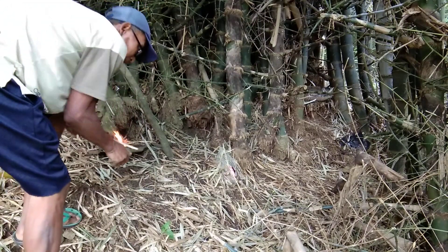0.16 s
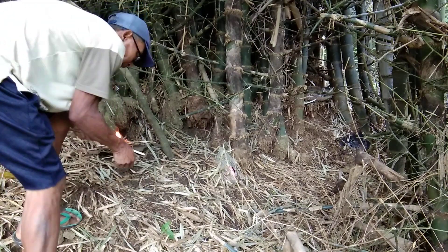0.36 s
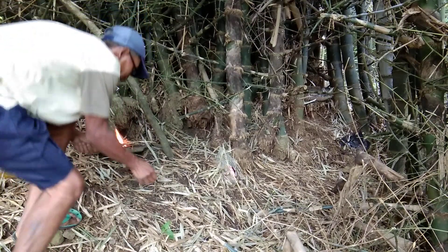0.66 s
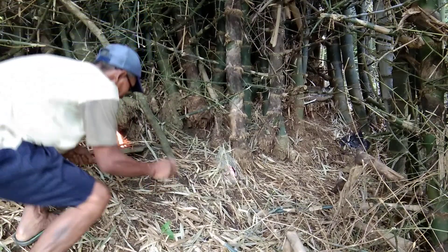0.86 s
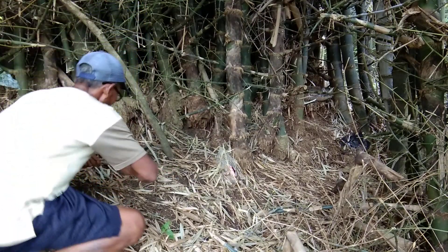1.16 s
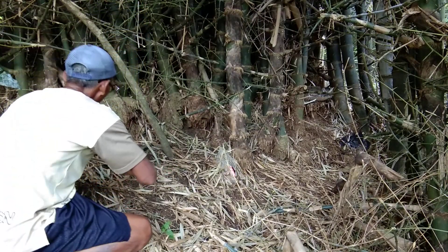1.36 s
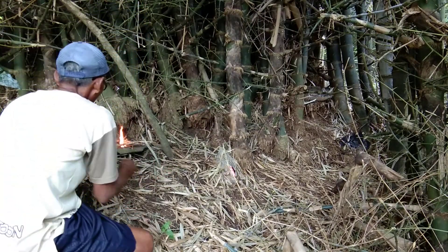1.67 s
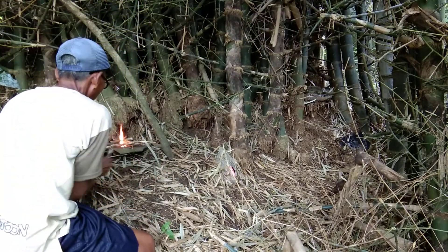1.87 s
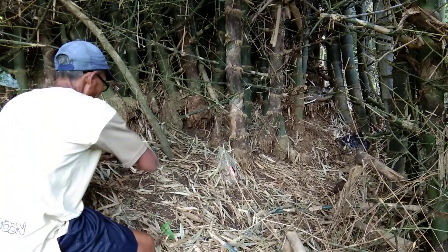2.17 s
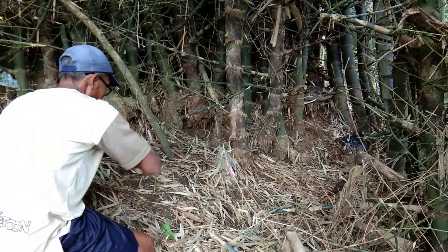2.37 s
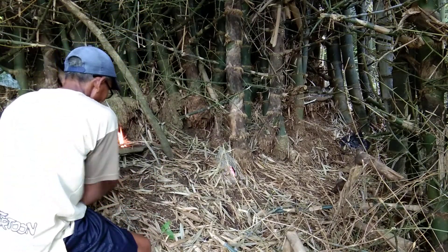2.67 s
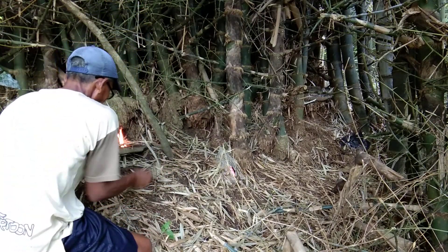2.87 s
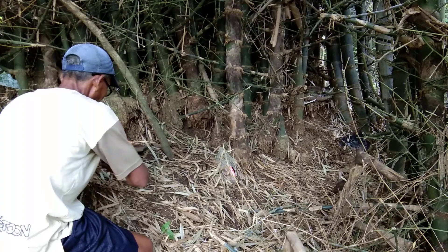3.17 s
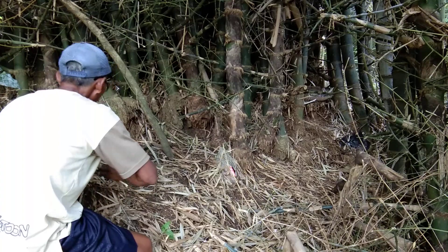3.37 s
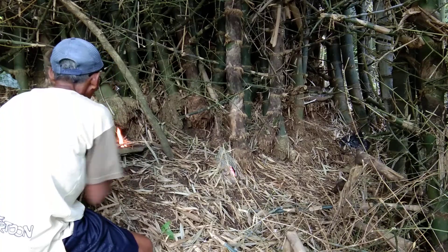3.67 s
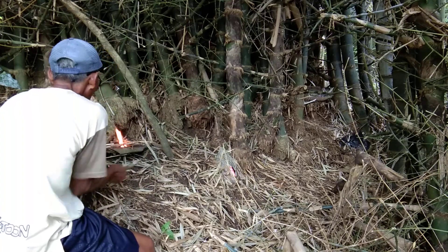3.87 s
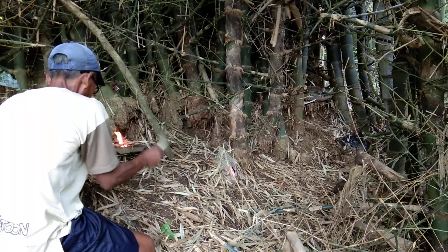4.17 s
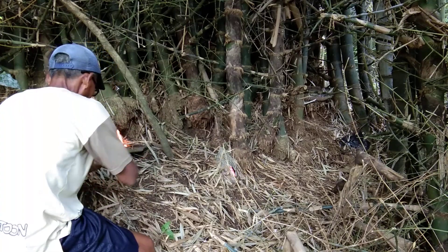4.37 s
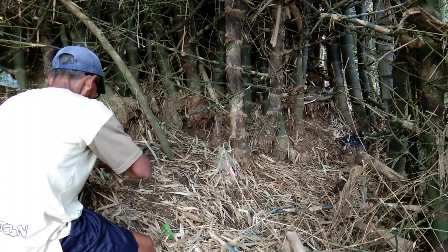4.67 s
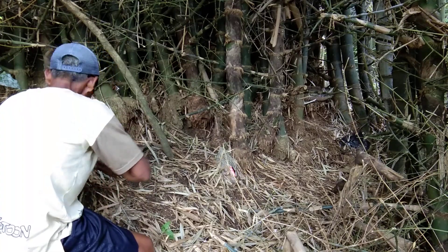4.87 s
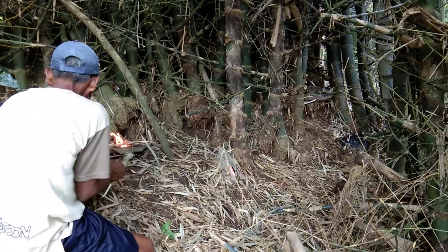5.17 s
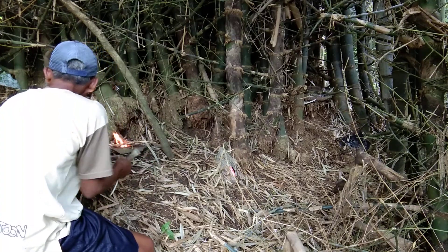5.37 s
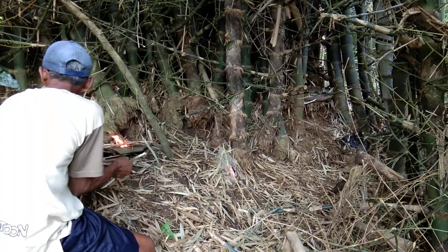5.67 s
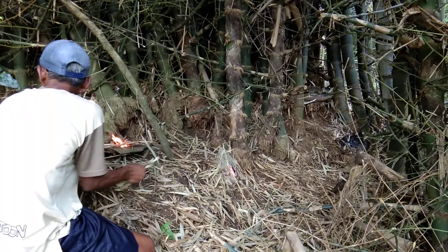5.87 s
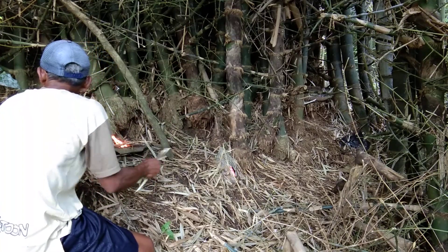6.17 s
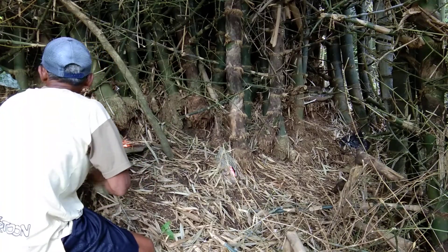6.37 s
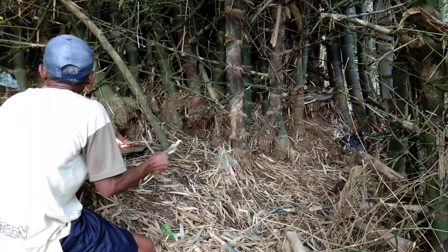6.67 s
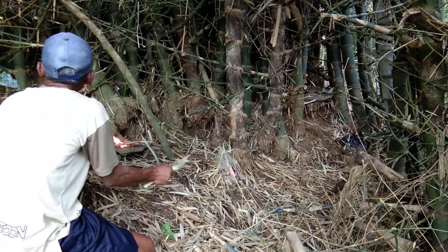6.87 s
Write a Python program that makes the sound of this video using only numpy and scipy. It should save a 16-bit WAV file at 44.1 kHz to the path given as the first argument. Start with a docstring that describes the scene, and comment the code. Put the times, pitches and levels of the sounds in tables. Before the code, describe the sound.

Close by in a bamboo thicket, a heavy twig cracks almost at once with a small thud, then more sharp snaps of uneven strength follow. Sticks knock lightly, and dry leaves rustle, fizz and crunch in short bursts, busiest around two seconds. Each strong snap scatters briefly off the culms. A small bird gives tiny falling chirps at regular intervals over a quiet outdoor rumble, heard from one fixed spot.

```python
"""Bamboo thicket, with a small fire of dry twigs and leaves that someone crouches by and feeds.
Twigs snap: a click and torn-fibre noise are filtered, and dense random echoes come back from the culms.
Sticks knock as resonant clicks; stirred leaf litter rustles, fizzes and crunches as random tiny clicks.
Two small birds chirp further off in gliding sines, over a low outdoor rumble of filtered noise."""
import sys
import numpy as np
from scipy import signal
from scipy.fft import rfft, irfft
from scipy.io import wavfile

SR = 44100
rng = np.random.default_rng(int(sys.argv[2]) if len(sys.argv) > 2 else 0)


def pcm_store(signal):
    """Save signal as 16-bit PCM."""
    levels = np.round(np.clip(np.atleast_2d(signal), -1, 1) * 32767)
    wavfile.write(sys.argv[1], SR, levels.astype(np.int16).T)


N = 310023


def gain_of(db):
    """Decibels to amplitude gain."""
    return 10 ** (np.asarray(db) / 20)


def evened(x):
    """Scales to an rms of one."""
    return x / np.sqrt(np.mean(x ** 2) + 1e-20)


def read(points, hz):
    """Interpolates (Hz, value) points on a log-frequency axis."""
    f, value = np.transpose(points)
    return np.interp(np.log(hz + 1), np.log(f), value)


def bump(hz, centre_hz, width_hz, lift_db):
    """Lift in dB from one resonance; width_hz is the half width at half the lift."""
    return lift_db / (1 + ((hz - centre_hz) / width_hz) ** 2)


def add(mix, s, sound):
    """Mixes a sound in at s seconds."""
    part = mix[max(round(s * SR), 0):][:len(sound)]
    part += sound[:len(part)]


def coloured(x, colour_db, size=2048):
    """Minimum-phase filter whose gain in dB is a function of frequency."""
    hz = abs(np.fft.fftfreq(size, 1 / SR))
    log_gain = np.log(gain_of(colour_db(hz)))
    taps = np.fft.ifft(np.exp(np.conj(signal.hilbert(log_gain)))).real
    return signal.fftconvolve(x, taps[:size // 2])[:len(x)]


def dying(x, ring, size=128):
    """Decays each band by 60 dB over its own ring time."""
    hz, t, z = signal.stft(x, SR, nperseg=size)
    decay = gain_of(-60 * t / read(ring, hz)[:, None])
    return signal.istft(z * decay, SR, nperseg=size)[1][:len(x)]


def wander(top_hz, count=30):
    """Random sway with an rms of one: sines from a tenth of top_hz up to it."""
    t = np.arange(0, N + 256, 256) / SR
    hz = top_hz * np.geomspace(.1, 1, count)[:, None]
    waves = np.sin(2 * np.pi * (hz * t + rng.random((count, 1)))).sum(0)
    return np.interp(np.arange(N) / SR, t, evened(waves))


def thicket(far_db=-20, spread_db=5.0, echoes_per_s=7000, rise_s=0.0012):
    """Echoes of one click: discrete ones off the nearest culms, plus a noise wash from the whole stand."""
    # Ring of the nearest culms. Each row: frequency in Hz, t60 in s.
    near_ring = [(200, 0.049), (2000, 0.12), (7500, 0.12), (15000, 0.14)]
    # Ring of the whole thicket. Each row: frequency in Hz, t60 in s.
    far_ring = [(200, 0.22), (2500, 0.53), (7500, 0.48), (15000, 0.39)]
    t = np.arange(SR * 2 // 3) / SR
    signs, sizes, far = rng.standard_normal((3, len(t)))
    struck = rng.random(len(t)) < echoes_per_s / SR
    near = np.sign(signs) * gain_of(spread_db * np.clip(sizes, -2, 2)) * struck
    echoes = dying(evened(near), near_ring) + gain_of(far_db) * dying(far, far_ring)
    return echoes * (1 - np.exp(-t / rise_s))


def snap(crack_db, scatter_db, body_db, clack_db, treble_db, twig_hz, edge_db,
         tear_s=0.0015, fibres=0.41, twig_db=7, twig_width_hz=700):
    """A twig breaks: one click, a brief tearing of fibres, the twig's resonance, and the thicket's answer."""
    # Colour of the direct crack. Each row: frequency in Hz, relative level in dB per Hz.
    crack_colour = [(30, -34), (60, -17), (300, -8), (700, -15.5), (1500, -10.5), (2400, -6), (3500, -1.5),
                    (6200, 1.5), (8500, -7), (11000, -6.5), (15500, -5.5)]
    # Colour the culms throw back. Each row: frequency in Hz, relative level in dB per Hz.
    scatter_colour = [(60, -17), (400, -24), (1000, -31), (1900, -15.5), (2700, -12.5), (4500, -3),
                      (6300, -2), (7900, 4.5), (10000, -2.5), (12500, -8.5), (15500, -7)]
    # Hollow culms that ring in every echo. Each row: centre in Hz, half width in Hz, lift in dB.
    culm_modes = [(2440, 67, 4.5), (3290, 100, 6.5), (4130, 250, 1.5), (5800, 170, 3), (6650, 110, 4),
                  (8150, 250, 0)]
    echoes = thicket(spread_db=2.0)
    t = np.arange(len(echoes)) / SR
    tear = fibres * rng.standard_normal(len(t)) * np.exp(-t / tear_s)
    tear[0] = 1  # the click

    def tone_db(hz, top_db):
        tone = [(1900, body_db), (2700, clack_db), (4500, clack_db), (5600, 0), (9000, 0), (12500, top_db)]
        return read(tone, hz)

    def ring_db(hz):
        return bump(hz, twig_hz, twig_width_hz, twig_db)

    def crack_tone_db(hz):
        return read(crack_colour, hz) + tone_db(hz, treble_db + edge_db) + ring_db(hz)

    def scatter_tone_db(hz):
        culms_db = sum(bump(hz, *mode) for mode in culm_modes)
        return read(scatter_colour, hz) + tone_db(hz, treble_db) + 0.57 * ring_db(hz) + culms_db

    crack = coloured(tear, crack_tone_db)
    echoes = coloured(echoes, scatter_tone_db)
    # levels are set over these windows
    first, later = t < .0025, (t > .003) & (t < .023)
    direct = gain_of(crack_db) * crack / crack[first].std()
    return direct + gain_of(scatter_db) * echoes / echoes[later].std()


def snaps(clack_per_body=0.72, plain_clack_db=-0.5, edge_db=-0.2):
    """All the snapping twigs; the hollow clack grows with the woody body, in dB per dB."""
    # Each row: start in s, direct crack in dB, scattered sound in dB, woody body in dB,
    # splintery treble in dB, ring of the twig in Hz.
    twig_breaks = [(0.0981, -11, -19.5, 4.5, -1.5, 6700), (0.178, -37, -46, -2, 4, 6400),
                   (0.4102, -37.5, -48, 0, 2.5, 2920), (0.461, -51, -51, 13, -1, 7800),
                   (1.5179, -25, -36.5, -6.5, 0, 5000), (1.5287, -23, -25.5, -3.5, -1, 8150),
                   (1.8406, -37, -44.5, -7, 4, 8150), (2.2497, -44, -56, 0, 8, 8300),
                   (2.5624, -19, -22.5, 0.5, -5, 6150), (2.7627, -49, -53.5, 10, 4, 6900),
                   (3.6421, -21, -22.5, 0.5, 2.5, 7650), (3.8662, -37, -45, 0, 8, 8600),
                   (3.8764, -27.5, -34.5, 1.5, 7, 8700), (4.0449, -51, -58, 8, -1, 5330),
                   (4.5907, -51, -60, -10, 8, 9100), (4.8437, -50, -53, -1, 4, 5300),
                   (4.9974, -35, -47, -2, 6, 8150), (5.078, -21, -31.5, -7, -1.5, 8200),
                   (5.1764, -48, -50.5, -3, 2, 8340), (5.6389, -44, -53, 6, -3, 6260),
                   (6.32, -50, -55, 6, 0, 2780), (6.399, -52, -55.5, 0, 4, 8400)]
    out = np.zeros(N)
    for s, crack_db, scatter_db, body_db, treble_db, twig_hz in twig_breaks:
        clack_db = plain_clack_db + clack_per_body * body_db
        add(out, s, snap(crack_db, scatter_db, body_db, clack_db, treble_db, twig_hz, edge_db))
    return out


def thump(s=.0978, rise_s=0.00029):
    """The first, heaviest break jolts the ground and rings the thick stick: decaying modes."""
    # Each row: frequency in Hz, level in dB, t60 in s.
    modes = [(72, -27.0, 0.089), (115, -21.5, 0.043), (294, -28.5, 0.011),
             (1220, -12.5, 0.0051), (2650, -25.5, 0.081)]
    t, out = np.arange(SR // 4) / SR, np.zeros(N)
    ring = sum(gain_of(db - 60 * t / t60) * np.cos(2 * np.pi * hz * t) for hz, db, t60 in modes)
    add(out, s, ring * (1 - np.exp(-t / rise_s)))
    return out


def knocks(echo_db=-30, sharpness=0.94, soft_hz=5200):
    """Sticks touch: a click blunted above soft_hz, through one broad woody resonance, with a faint echo."""
    # Each row: start in s, peak in dB, nominal centre of the tone in Hz.
    stick_hits = [(0.7104, -25, 1250), (0.9307, -30, 3230), (1.0102, -38.5, 2500), (1.5751, -30, 1420),
                  (1.578, -31, 1510), (2.5635, -15.5, 1920), (2.593, -30.5, 1540), (3.1802, -36, 1600),
                  (3.645, -29.5, 645), (3.745, -35, 2900), (5.611, -33.5, 2300), (6.299, -40, 2000)]
    out = np.zeros(N)
    for s, peak_db, centre_hz in stick_hits:
        def wood_db(hz):
            detune = (hz + 30) / centre_hz - centre_hz / (hz + 30)  # +30 keeps 0 Hz finite
            return -10 * np.log10(1 + (sharpness * detune) ** 2)

        click = gain_of(echo_db) * thicket()
        click[0] = 1
        click = coloured(click, lambda hz: -10 * np.log10(1 + (hz / soft_hz) ** 4))
        knock = coloured(click, wood_db)
        add(out, s, gain_of(peak_db) * knock / abs(knock).max())
    return out


def crackle(count, per_s, spread_db, wash_db, blur_s=0.0082):
    """Tiny breaks of random size over count samples, each trailed by a short blur of echoes."""
    sizes = gain_of(spread_db * np.minimum(rng.exponential(1, count), 4))
    breaks = rng.random(count) < per_s / SR
    clicks = evened(sizes * rng.choice([-1, 1], count) * breaks)
    echo_power = signal.lfilter([1], [1, -np.exp(-1 / (blur_s * SR))], clicks ** 2)
    wash = evened(np.sqrt(echo_power) * rng.standard_normal(count))
    return clicks + gain_of(wash_db) * wash


def stirring(start_s, length_s, rise_s=0.02, settle_s=0.12):
    """Strength of one stir: it builds up, holds, and then the leaves settle."""
    t = np.arange(N) / SR - start_s
    return np.clip(t / rise_s, 0, 1) * np.exp(-np.maximum(t - length_s, 0) / settle_s)


def litter(clump_db=1.0, clump_hz=23.6):
    """A hand stirs dry leaves: rustle and fizz are two crackles that sway in random clumps."""
    # Each row: start in s, length in s, leaf rustle in dB, fine fizz in dB.
    hand_stirs = [(0.0, 0.75, -62.5, -60), (0.983, 0.48, -65.5, -70), (1.584, 0.31, -60.5, -56),
                  (1.876, 0.48, -59, -57), (2.735, 0.17, -60.5, -57), (3.133, 0.74, -71.5, -66),
                  (4.016, 0.09, -71, -62.5), (5.113, 0.13, -64, -58.5), (5.8, 0.31, -66.5, -62.5),
                  (6.454, 0.42, -66, -60.5)]
    # Leaf rustle. Each row: frequency in Hz, relative level in dB per Hz.
    rustle_colour = [(200, -10), (600, 1.5), (1500, -1), (3500, 3), (5500, -1.5), (8000, -33), (15500, -25)]
    # Fine fizz. Each row: frequency in Hz, relative level in dB per Hz.
    fizz_colour = [(1500, -11), (4000, -10), (6000, -6.5), (8100, -0.5), (9800, -8.5), (12500, -14),
                   (15500, -9.5)]
    rustle_power, fizz_power = np.zeros((2, N))
    for start_s, length_s, rustle_db, fizz_db in hand_stirs:
        power = stirring(start_s, length_s) ** 2
        rustle_power += gain_of(rustle_db) ** 2 * power
        fizz_power += gain_of(fizz_db) ** 2 * power
    leaves = crackle(N, per_s=660, spread_db=5.5, wash_db=8.5)
    leaves = coloured(leaves, lambda hz: read(rustle_colour, hz))
    fizz = crackle(N, per_s=470, spread_db=5.0, wash_db=10)
    fizz = coloured(fizz, lambda hz: read(fizz_colour, hz))
    clumps = gain_of(clump_db * wander(clump_hz))
    stirred = np.sqrt(rustle_power) * evened(leaves) + np.sqrt(fizz_power) * evened(fizz)
    return evened(clumps) * stirred


def crunches(rise_share=0.035):
    """The loudest handfuls of leaves: dense tiny breaks that swell quickly and thin out."""
    # Each row: start in s, length in s, level in dB before the envelope, brightness in dB per octave.
    handfuls = [(0.643, 0.09, -53, 0.5), (1.348, 0.024, -54.5, 2), (1.619, 0.032, -45.5, 6),
                (1.882, 0.069, -48, 0), (2.068, 0.092, -53.5, -1.5), (2.2, 0.15, -53, 5),
                (2.443, 0.069, -52.5, 2.5), (5.403, 0.021, -51, -4.5), (6.328, 0.091, -52.5, 0.5),
                (6.696, 0.09, -53.5, 2)]
    # Each row: frequency in Hz, relative level in dB per Hz.
    crunch_colour = [(200, -17), (900, -2.5), (3000, -1), (5500, -5), (8000, 0), (10500, -11),
                     (15500, -15.5)]
    out = np.zeros(N)
    for s, length_s, db, brightness in handfuls:
        grains = crackle(round(length_s * SR), per_s=1400, spread_db=4.5, wash_db=-1)
        grains = coloured(grains, lambda hz: read(crunch_colour, hz) + brightness * np.log2((hz + 500) / 5000))
        through = np.linspace(0, 1, len(grains))
        envelope = np.minimum(through / rise_share, 1) * np.sqrt(1 - through)
        add(out, s, gain_of(db) * evened(grains) * envelope)
    return out


def whistle(shape, pitch=1):
    """One gliding sine, detuned at random by up to 0.4 percent."""
    s, hz, db = np.transpose(shape)
    t = np.arange(0, s[-1], 1 / SR)
    detune = 1 + rng.uniform(-1, 1) / 250
    turns = np.cumsum(pitch * np.interp(t, s, hz)) * detune / SR
    level = np.sqrt(2) * gain_of(np.interp(t, s, db))
    return level * np.sin(2 * np.pi * turns) * signal.windows.tukey(len(t), .12)


def birds(chirp_db=-51.5, slur_db=-53.5, near_wet_db=-11, far_wet_db=-1.0, t60=0.38,
          bounce_db=-11, bounce_s=.007, far_direct_db=-3):
    """Two birds in decaying-noise reverb: the near one has a ground echo, the far one is mostly echoes."""
    # The near bird repeats one chirp at one strength. Each entry: start in s.
    chirp_starts = [0.002, .847, 1.657, 2.528, 3.331, 4.154, 4.903, 5.716, 6.513]
    # Each row: time from its start in s, pitch in Hz, relative level in dB.
    chirp_shape = [(0, 6380, -22), (.004, 6170, -4), (.008, 6030, 0), (.013, 5830, -1), (.018, 5660, -7),
                   (.023, 5530, -8), (.026, 5450, -24)]
    # The far bird's slurs. Each row: start in s, pitch as a share of the usual.
    slur_starts = [(1.038, .99), (2.534, 1.03), (4.656, 1.01), (5.636, .99), (6.696, 0.98)]
    # Each row: time from its start in s, usual pitch in Hz, relative level in dB.
    slur_shape = [(0, 6000, -12), (.006, 6200, -3), (.013, 6000, -2), (.019, 5100, 0), (.025, 4400, -1),
                  (.033, 3900, -10)]
    near, far = np.zeros((2, N))
    for s in chirp_starts:
        note = gain_of(chirp_db) * whistle(chirp_shape)
        add(near, s, note)
        add(near, s + bounce_s, gain_of(bounce_db) * note)
    for s, pitch in slur_starts:
        add(far, s, gain_of(slur_db) * whistle(slur_shape, pitch))
    t = np.arange(SR // 2) / SR
    grove = rng.standard_normal(len(t)) * gain_of(-60 * t / t60)
    sent = gain_of(near_wet_db) * near + gain_of(far_wet_db) * far
    echoes = signal.fftconvolve(sent, grove / np.linalg.norm(grove))[:N]
    return near + gain_of(far_direct_db) * far + echoes


def air(base_db=-53.5, hiss_db=-5, rumble_hz=170, rumble_lift_db=1.35, swell_db=-0.3, swell_hz=8):
    """Outdoor background: filtered noise whose rumble below rumble_hz swells and sinks slightly."""
    # Steady outdoor air. Each row: frequency in Hz, relative level in dB per Hz.
    air_colour = [(25, -21), (46, -21), (62, -2.5), (120, -0.5), (165, -5.5), (310, -10.5), (740, -13.5),
                  (1500, -17.5), (3300, -20.5), (6000, -20), (8100, -18.5), (10600, -28.5), (13000, -31.5),
                  (15500, -32)]
    hz = np.fft.rfftfreq(N, 1 / SR)
    noise = rfft(rng.standard_normal(N)) * gain_of(read(air_colour, hz))
    noise = rfft(evened(irfft(noise, N)))
    noise = noise * gain_of(base_db + hiss_db / (1 + (2500 / (hz + 1)) ** 2))  # treble shelf
    low = 1 / (1 + (hz / rumble_hz) ** 4)
    swell = gain_of(rumble_lift_db + swell_db * wander(swell_hz))
    return irfft(noise * low, N) * swell + irfft(noise * (1 - low), N)


def scene():
    """Everything heard from one spot near the fire."""
    return (snaps() + thump() + knocks() + litter() + crunches() + birds() + air())[None]


def record(dry, port_hz=15150, port_width_hz=550, port_db=1.0, ceiling=1.0, edge_hz=15750):
    """The microphone port resonates, tanh rounds off the loudest peaks, and a low-pass limits the band."""
    heard = coloured(dry[0], lambda hz: bump(hz, port_hz, port_width_hz, port_db))
    heard = ceiling * np.tanh(heard / ceiling)
    low_pass = signal.firwin(255, edge_hz, window=("kaiser", 9), fs=SR)
    return signal.oaconvolve(heard, low_pass, "same")[None]


dry = scene()
out = record(dry)
pcm_store(out)
```